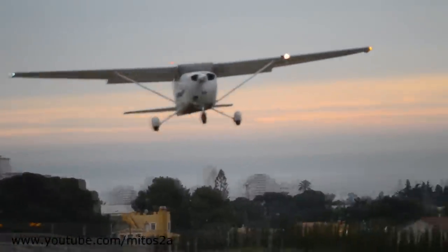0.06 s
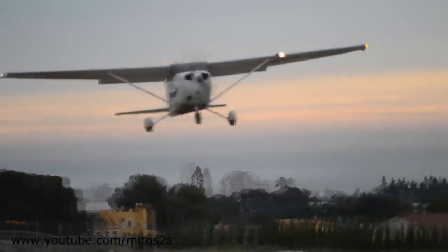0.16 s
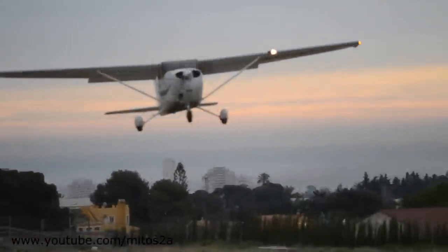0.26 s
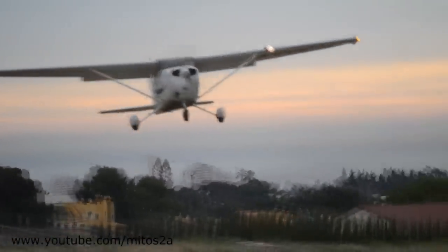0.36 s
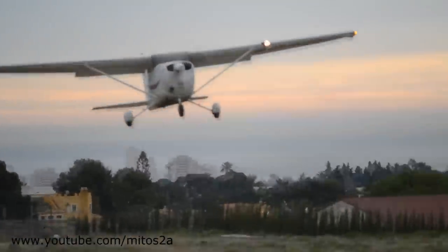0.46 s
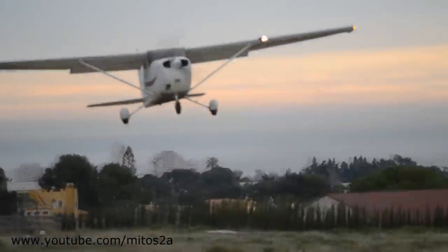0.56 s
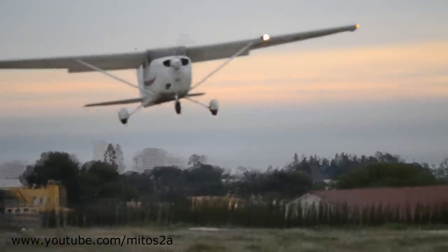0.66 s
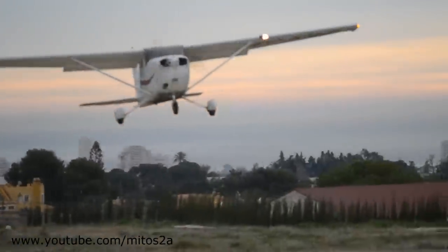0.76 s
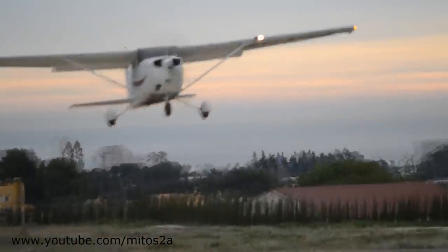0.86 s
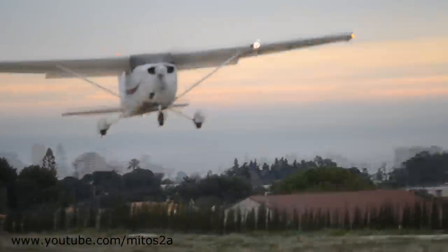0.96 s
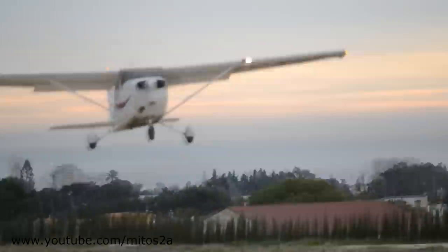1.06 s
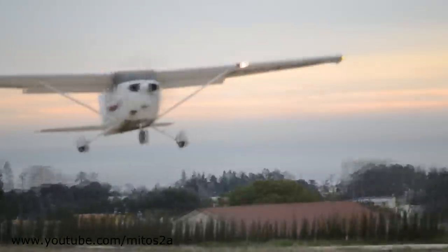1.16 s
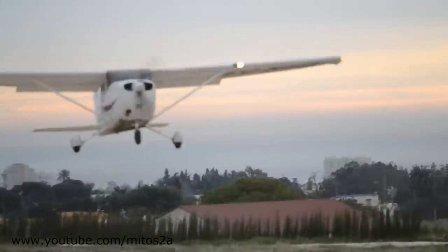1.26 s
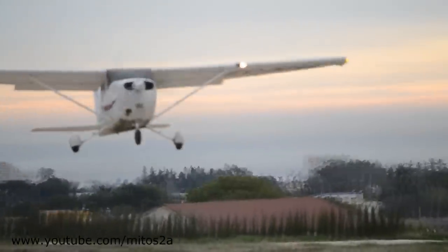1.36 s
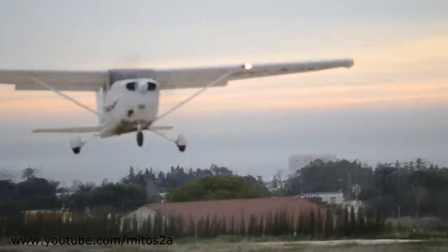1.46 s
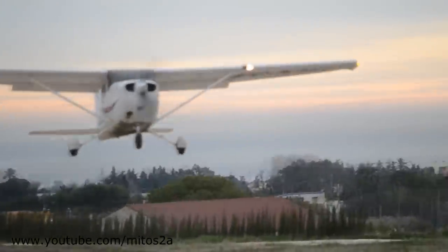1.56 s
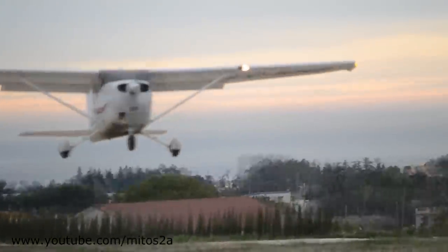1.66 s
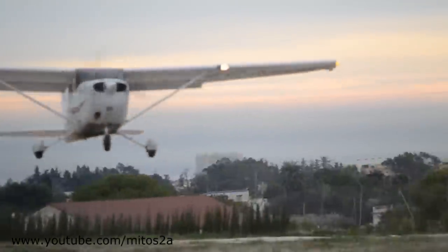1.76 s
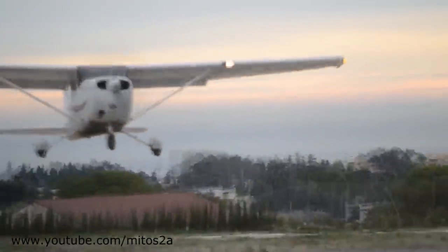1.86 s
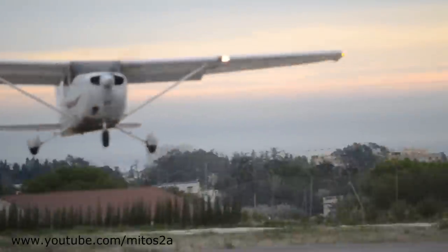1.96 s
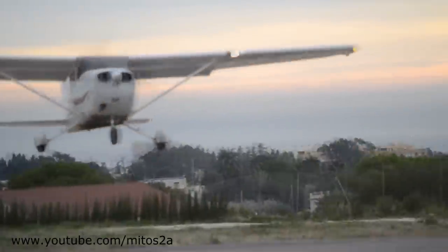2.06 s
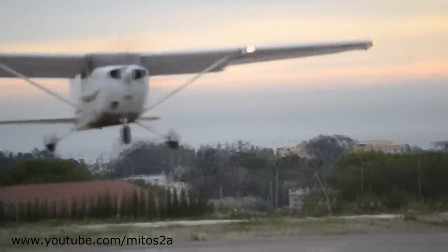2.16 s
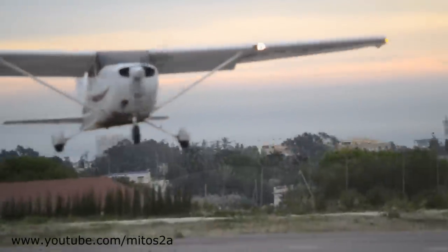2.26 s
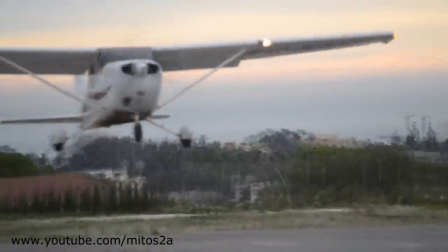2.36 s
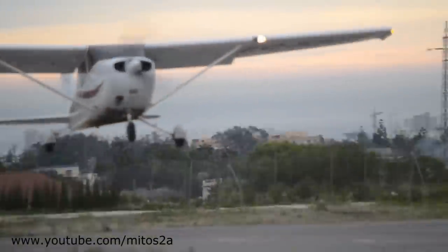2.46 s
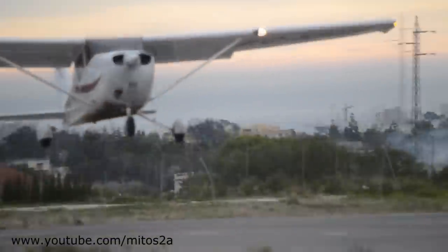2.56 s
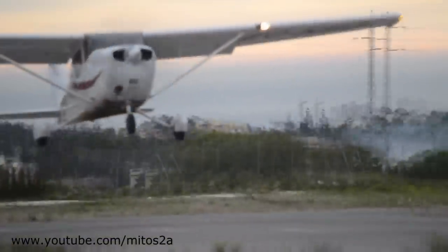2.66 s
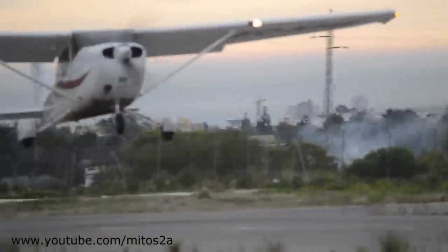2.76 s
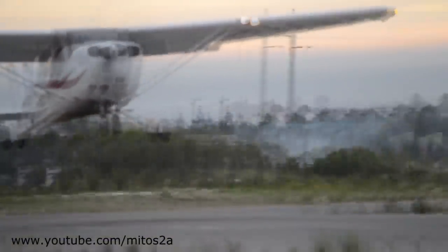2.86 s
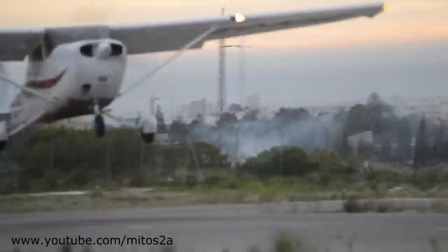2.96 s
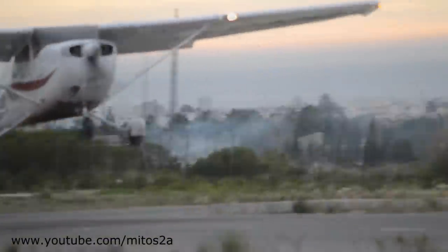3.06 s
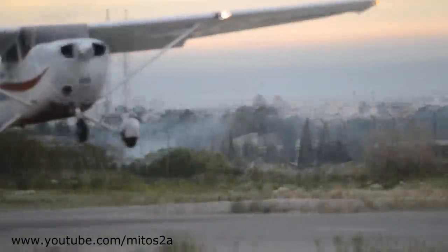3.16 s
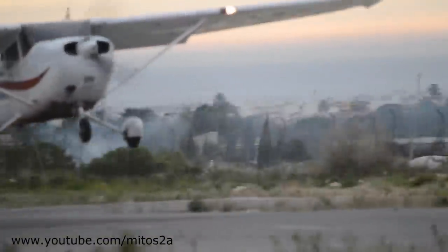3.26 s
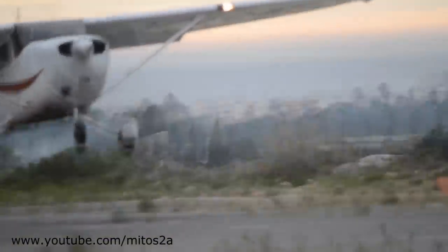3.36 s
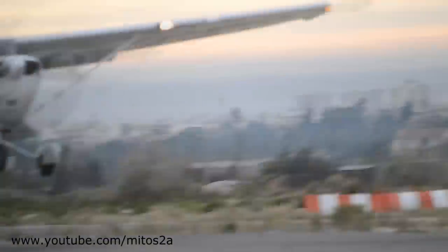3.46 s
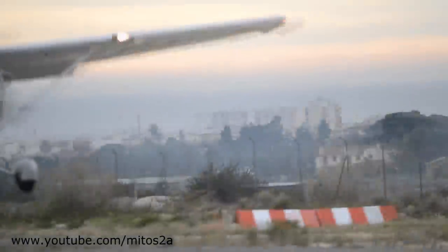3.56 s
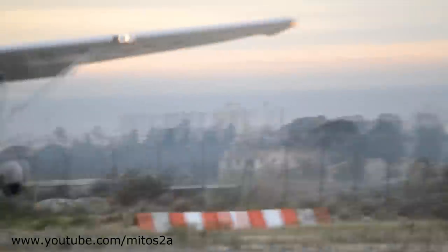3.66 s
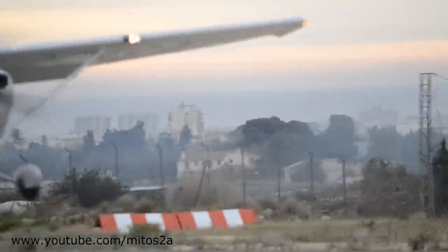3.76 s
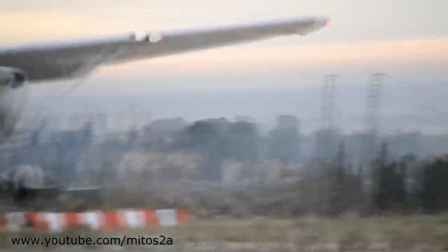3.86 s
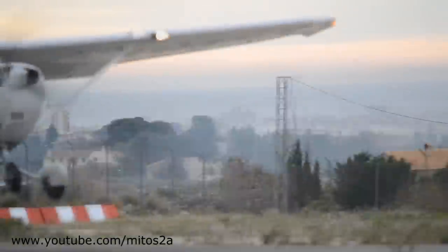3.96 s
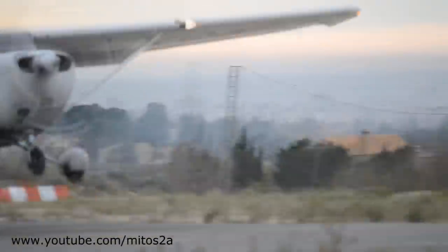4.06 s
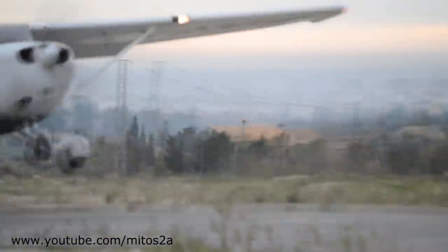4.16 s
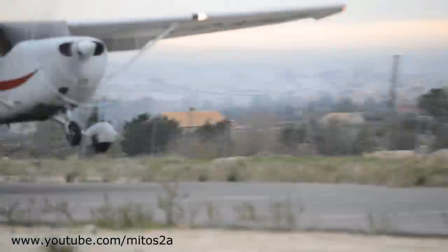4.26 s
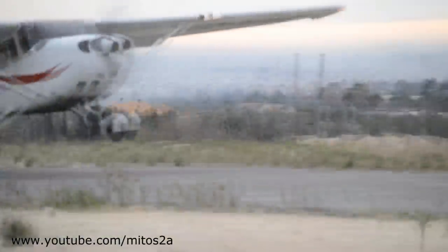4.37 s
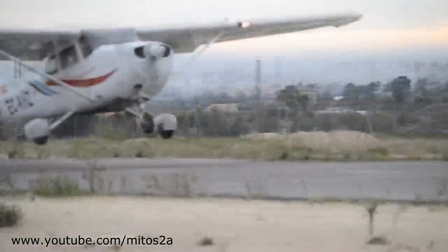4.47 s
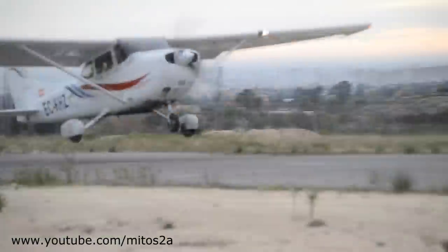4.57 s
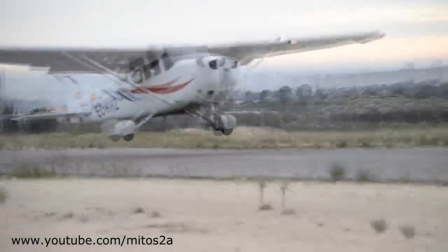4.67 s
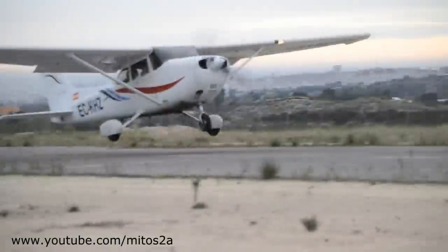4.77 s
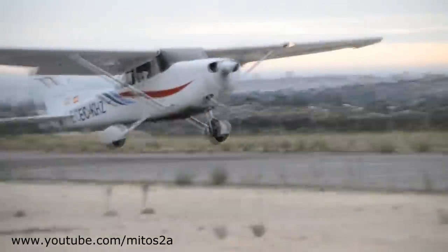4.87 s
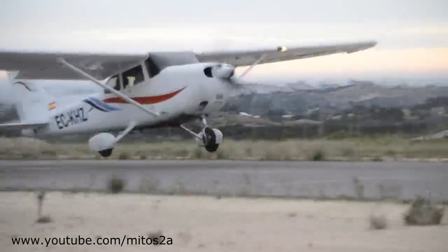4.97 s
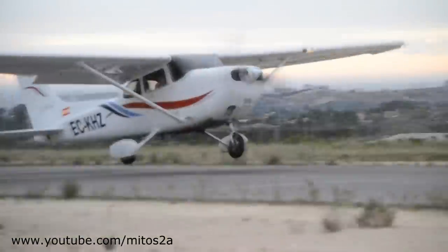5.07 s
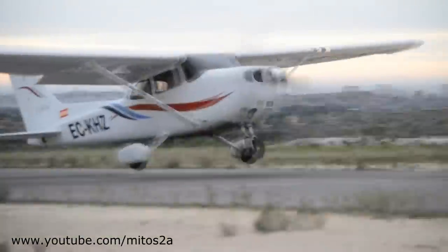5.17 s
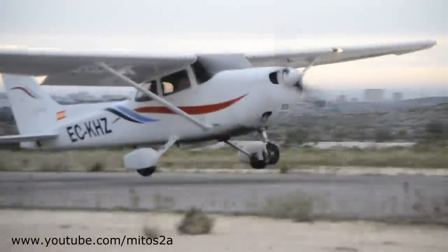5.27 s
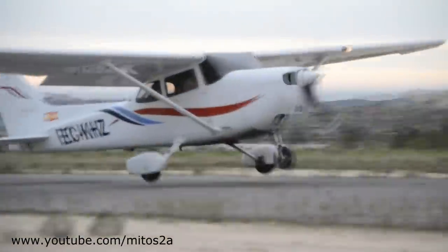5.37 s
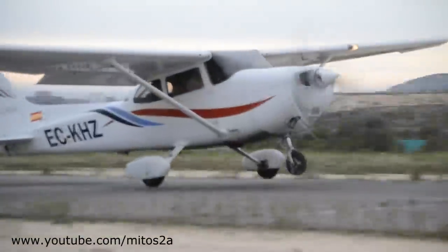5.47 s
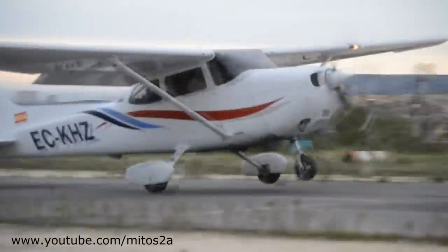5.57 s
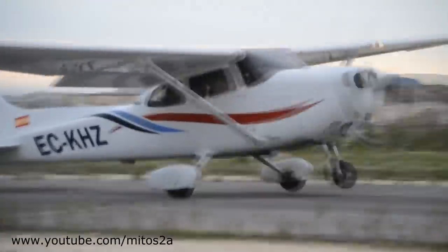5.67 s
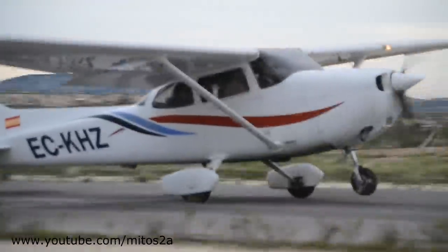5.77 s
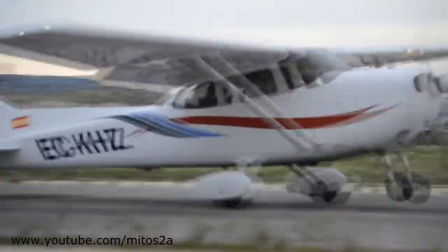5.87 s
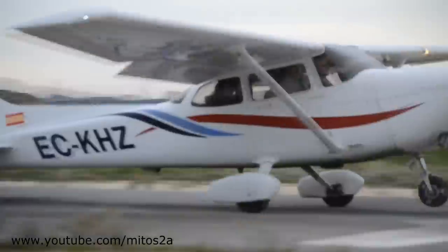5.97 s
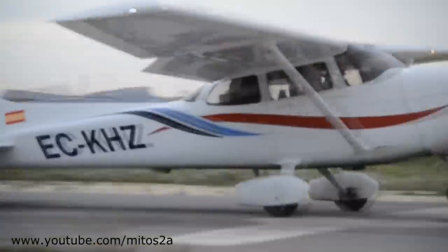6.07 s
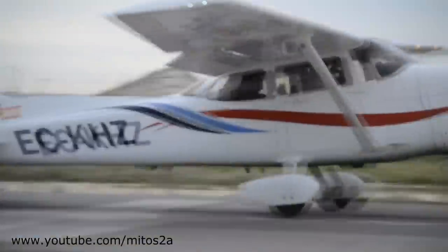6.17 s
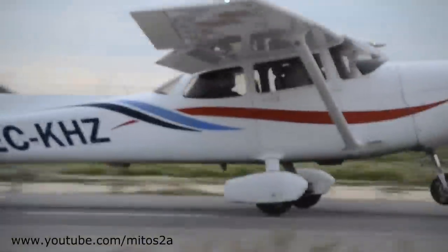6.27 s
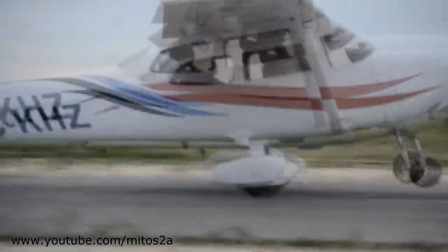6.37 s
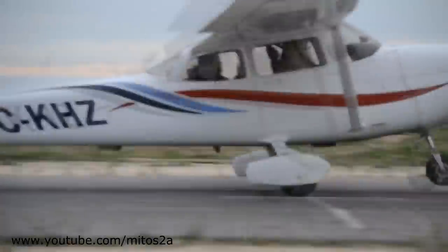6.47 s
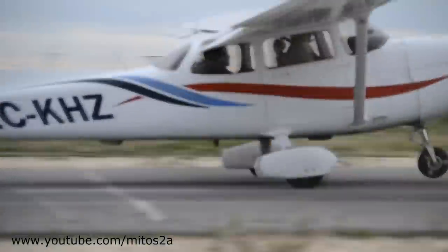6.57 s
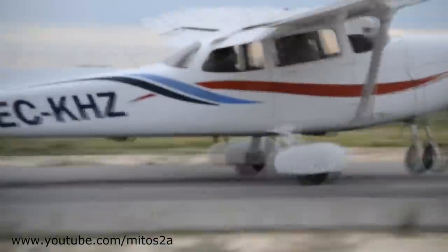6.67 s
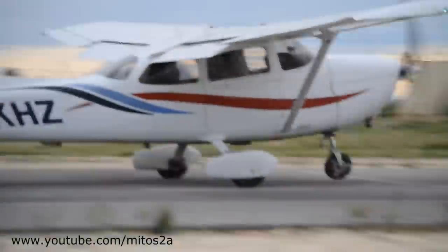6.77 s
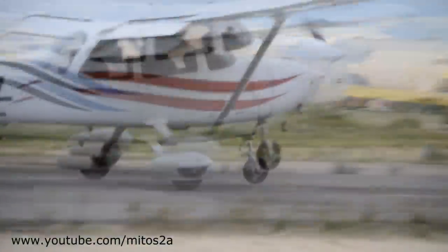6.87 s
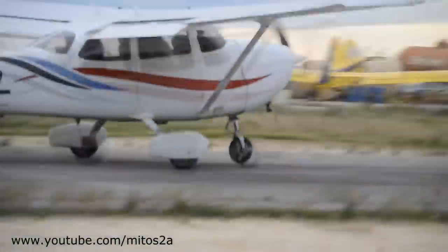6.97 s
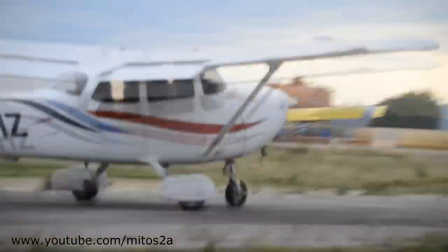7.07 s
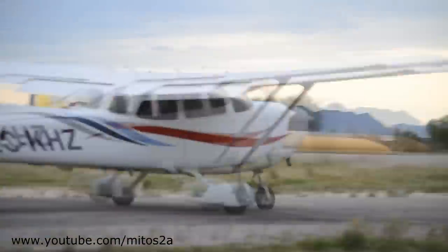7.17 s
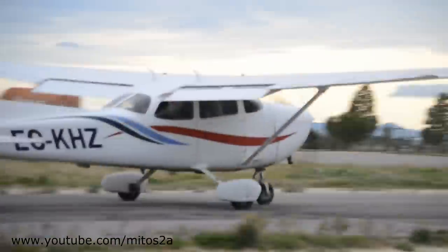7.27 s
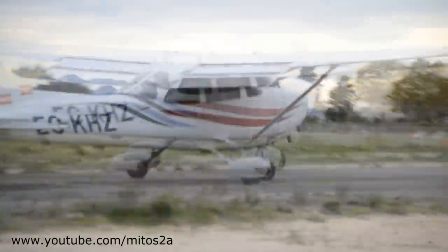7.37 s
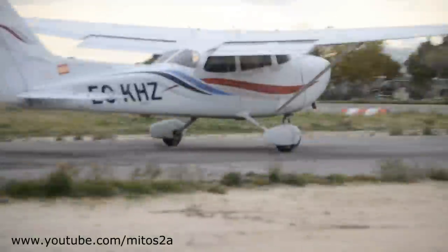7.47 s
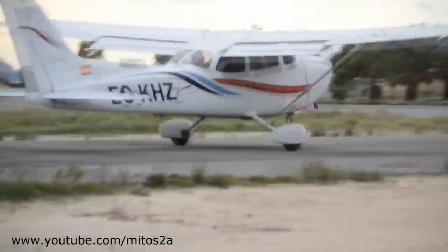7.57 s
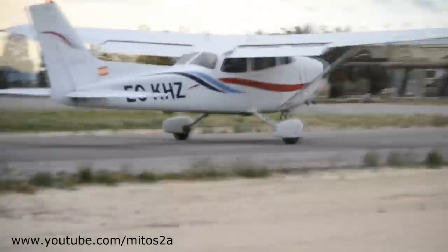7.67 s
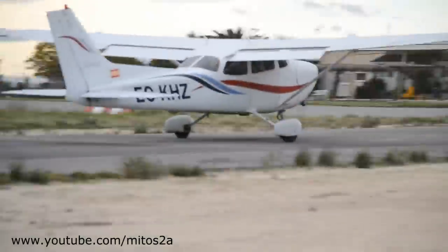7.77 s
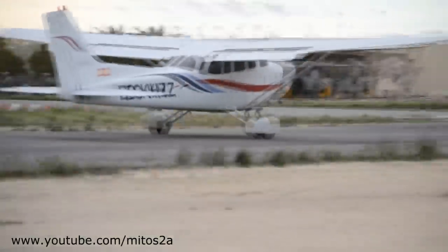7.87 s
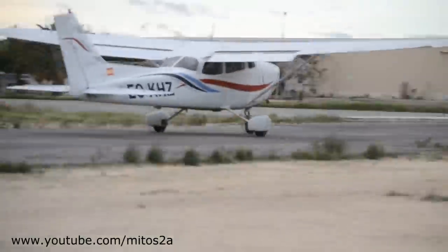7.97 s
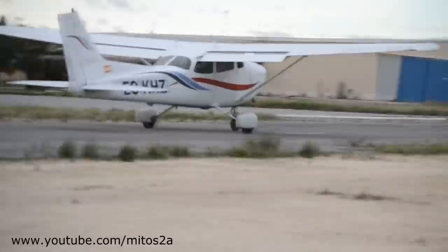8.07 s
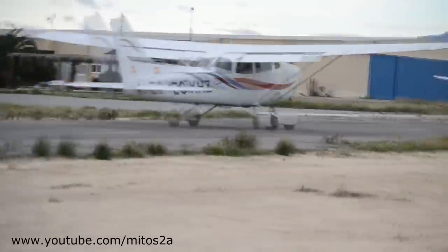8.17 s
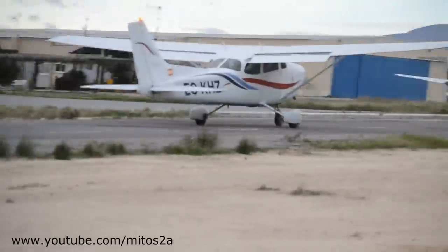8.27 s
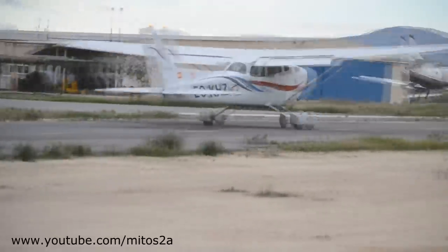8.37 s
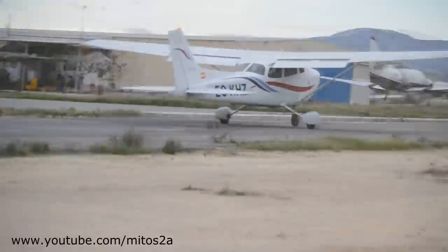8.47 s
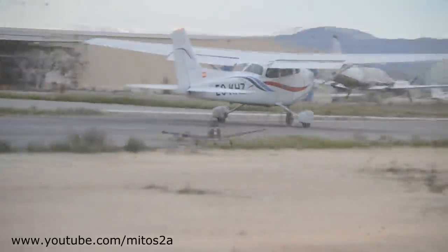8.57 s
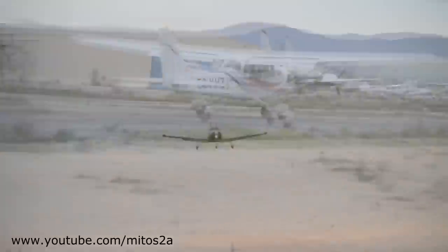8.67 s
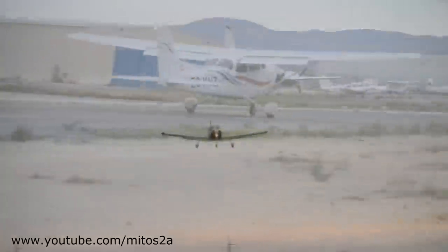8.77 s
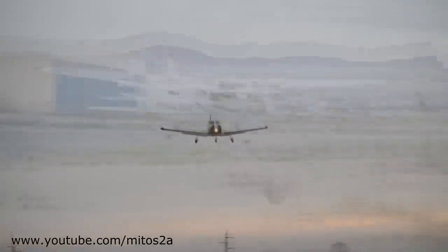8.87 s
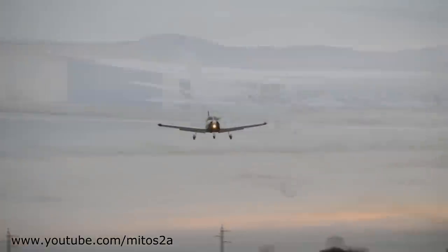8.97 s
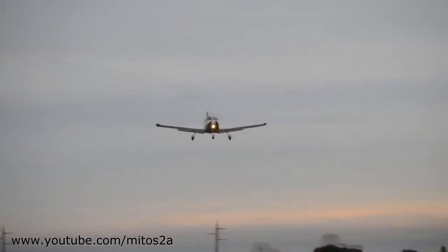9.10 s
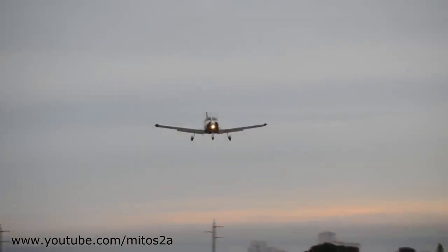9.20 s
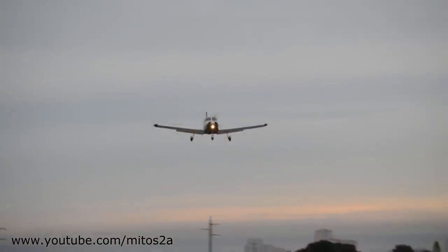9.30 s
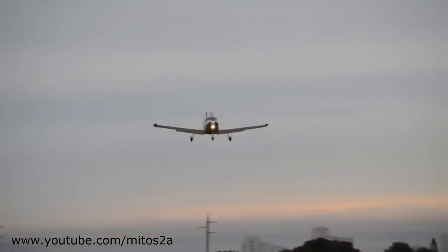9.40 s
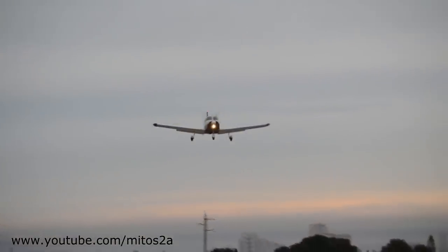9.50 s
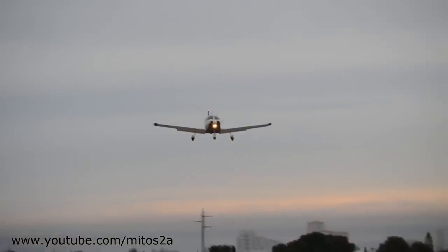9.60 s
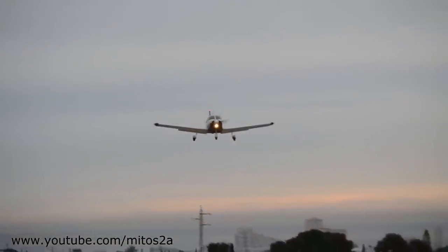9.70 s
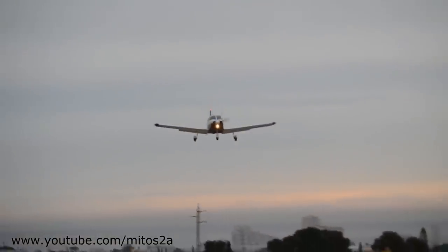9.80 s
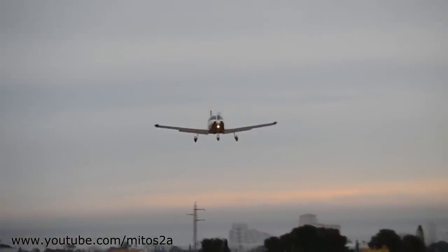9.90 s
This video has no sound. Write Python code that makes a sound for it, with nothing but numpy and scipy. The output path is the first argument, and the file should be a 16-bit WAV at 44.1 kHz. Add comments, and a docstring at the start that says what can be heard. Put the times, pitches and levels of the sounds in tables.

```python
"""Light aircraft landing

A light aircraft glides in throttled back: firing pulses make its exhaust note, burble and hiss, with pops.
Its blades and airframe rush; two main tyres chirp as stick-slip tones as it passes; it rolls away and fades.
A second aircraft, wavering tones over dull noise, drones faintly throughout and is left bare at the end."""
import sys
import numpy as np
from scipy import signal
from scipy.fft import rfft, irfft, next_fast_len
from scipy.io import wavfile
from scipy.ndimage import uniform_filter1d, map_coordinates

SR = 44100
rng = np.random.default_rng(int(sys.argv[2]) if len(sys.argv) > 2 else 0)


def materialize(psi):
    """Save the field psi as 16-bit PCM at rate SR to the path in sys.argv[1].

    A 1-D psi becomes a single channel; in a 2-D psi each row is a channel.
    """
    bounded = np.clip(np.atleast_2d(psi).T, -1, 1)
    quanta = np.round(bounded * 32767).astype(np.int16)
    wavfile.write(sys.argv[1], SR, quanta)


N = 438354
T = np.arange(N) / SR

# Distant aircraft's engine lines. Each row: frequency in Hz, relative level in dB.
DRONE_LINES = [(75, -51.5), (108, -65), (157, -54.5), (183, -54.5)]
# Spectrum of its roar. Each row: frequency in Hz, gain in dB.
DISTANT_ROAR = [(18, -57), (30, -38), (48, -19.5), (59, -15.5), (117, -9.5), (129, -11), (163, -7),
                (311, -12.5), (414, -24), (565, -16.5), (1400, -16), (2860, -30), (9000, -56.5),
                (11700, -95), (19800, -120)]
# Side of the aircraft heard. Each row: angle off the nose in degrees, side (0 far ahead, 1 nose, 2 flank, 3 tail).
ASPECT = [(10.3, 0), (15.7, 1), (58, 2), (116, 2.5), (149, 3)]
# Spectra of burble, air rush and exhaust hiss, one list per side 0-3. Each row: frequency in Hz, gain in dB.
BURBLE_SPECTRA = [
    [(21, -60), (35, -24), (101, -3), (184, 1), (302, -5), (464, -24), (520, -28), (680, -57), (1140, -120)],
    [(25, -22), (50, -5), (85, -11), (135, 2), (180, 0.5), (235, -2), (310, 3.5), (410, -9.5), (520, -8),
     (750, -58)],
    [(25, -31), (60, -14.5), (120, 0.5), (220, 7), (320, 0.5), (420, -19), (520, -3), (800, -49.5)],
    [(21, -62.5), (35, -38), (54, -14), (98, -7.5), (279, 5), (397, -13), (520, -2), (680, -21.5),
     (1140, -120)],
]
RUSH_SPECTRA = [
    [(220, -6.5), (380, -1), (468, -7), (508, -10.5), (546, -7.5), (784, -2), (877, -12.5), (1080, -3.5),
     (1350, -14), (1800, -6), (2230, -19), (2600, -20.5), (3380, -32), (5720, -120)],
    [(220, -46), (380, -4), (432, -23), (512, -5), (550, -8.5), (673, -1.5), (765, 0), (943, -11),
     (1090, -4.5), (1420, -11), (1500, -8), (1840, -5.5), (2130, -14), (2600, -13.5), (3380, -14),
     (5720, -120)],
    [(220, -37), (380, -12.5), (504, -13), (641, -1), (729, -1.5), (877, -6), (1110, -10), (1200, -13),
     (1480, -14), (1680, -12), (2040, -23), (2600, -16.5), (3380, -31.5), (5720, -120)],
    [(220, -54), (380, -13), (402, -10), (559, 0), (662, 5), (797, -7.5), (906, 0.5), (1100, -6),
     (1420, -8.5), (1930, -16), (2160, -14.5), (2600, -40.5), (3380, -46), (5720, -120)],
]
HISS_SPECTRA = [
    [(1240, -20), (2100, -1), (3020, -2.5), (3900, 0), (6420, -9), (8120, -19), (9220, -24.5), (11500, -55),
     (15000, -92), (22000, -120)],
    [(1240, -30), (2100, -9.5), (4630, 0.5), (5810, -5.5), (6560, -5.5), (7940, -14), (9360, -17),
     (10300, -30), (11500, -58), (15000, -63), (22000, -120)],
    [(1240, -55.5), (2100, -11), (3260, 0.5), (3900, -3.5), (4370, -1.5), (5300, -9.5), (8900, -7),
     (10000, -15.5), (11500, -47.5), (15000, -77.5), (22000, -120)],
    [(1300, -33), (2200, -2), (3000, -2.5), (4400, -7), (5700, -12), (7500, -15.5), (9400, -17),
     (10300, -28.5), (11500, -40), (15000, -84)],
]
# Top of the hiss. Each row: frequency in Hz, gain in dB.
SIZZLE_SPECTRUM = [(12300, -49.5), (13500, -8), (14500, -0.5), (15800, -18)]
# Radiation by direction, referred to the closest distance. Each row: angle off the nose in degrees,
# burble in dB, rush in dB, hiss in dB, share of the hiss that comes in puffs (0-1).
DIRECTIVITY = [(12, -29.5, -24.5, -28, 0.51), (28.5, -28, -27, -35, 0.3), (44.6, -30, -29.5, -35.5, 0.44),
               (92, -32, -29, -31.5, 0.85), (125.5, -33, -23.5, -32.5, 0.54), (147.8, -28, -29, -41, 0.02),
               (154, -28.5, -31, -44, 0.3)]
# Brief swells in passing. Each row: centre in seconds, half length in seconds, rush in dB, hiss in dB.
SWELLS = [(4.887, 0.43, 3, 5), (6.12, 0.14, 6.5, 0), (6.485, 0.077, 0.5, 3), (8.062, 0.11, 2.5, 0),
          (8.488, .13, 4.5, 2.5)]
# Engine speed on the glide. Each row: time in seconds, firings per second.
GLIDE = [(0, 50.95), (1.7, 55.75), (2.1, 56.3), (3.7, 54.9), (5.1, 53.8)]
# Throttle cuts. Each row: start in seconds, firings per second lost, settling time in seconds.
THROTTLE_CUTS = [(5.17, 12.1, .33), (7.2, 15.5, 1.02)]
# Mean strength of each cylinder's firing, in dB.
CYLINDERS_DB = [1.8, -0.055, -0.67, -0.48]
# Exhaust note. Each row: multiple of the firing rate, relative dB approaching, relative dB passing.
NOTE_ORDERS = [(1, -4, -23.5), (2, -4, -2.5), (3, -4, 1), (4, -19, -2), (5, 1.5, -1), (6, -2.5, -8.5),
               (7, -22, -17), (8, -15, -10.5)]
# Afterfire. Each row: time in seconds (the blow lands 3 ms later), relative strength in dB.
POPS = [(0.385, -19), (0.707, -23), (0.886, -25.5), (0.994, -20.5), (1.145, -28), (1.168, -23),
        (1.468, -23), (1.584, -22.5), (1.966, -32), (2.317, -19), (3.015, -20)]
# Pop spectrum. Each row: frequency in Hz, gain in dB.
POP_SPECTRUM = [(30, -30), (90, -7.5), (190, 2.5), (320, -2.5), (500, -10), (900, -41), (3000, -68),
                (8000, -100)]
# Metallic resonances of pipe and cowling: lowest and highest pitch in Hz.
RING_HZ = (2400, 11000)
# Main tyres. Each row: bite in seconds, skid before it in seconds, skid in dB, peak in dB, hold in seconds,
# decay in dB per second, pitch after the bite in Hz, drift in Hz per second, overtones in dB, scrub in dB.
CHIRPS = [(5.884, 0.024, -9, -2.5, .005, 419, 712, -600, -3.5, -14),
          (6.044, 0.021, -25, 2, 0.0063, 529.5, 621, 1700, -16, -20)]
# Tyre overtones. Each row: multiple of the pitch, relative level in dB.
TYRE_OVERTONES = [(2, -14), (3, -22), (4, -28), (5, -27.5), (6, -37.5)]
# Dry ticks on the roll-out. Each row: onset in seconds, relative level in dB.
TICKS = [(7.7828, -40), (8.1653, -34), (8.1973, -33), (8.4367, -39), (8.649, -35), (8.752, -34.5),
         (8.7694, -48), (8.9685, -39), (9.0773, -38)]
# Tick pitch: lowest and highest in Hz.
TICK_RING_HZ = (3200, 6000)
# Fuzz around a tick's pitch. Each row: distance from the pitch in Hz, gain in dB.
TICK_SPREAD = [(300, -3), (1200, -9), (3000, -20), (6000, -60)]
# Microphone response. Each row: frequency in Hz, gain in dB.
MICROPHONE = [(7300, 0), (7950, -3.5), (8500, 1), (11000, 6), (12200, -17)]

TOP_HZ = 15900  # band limit
# straight track past the listener
SPEED_M_PER_S, CLOSEST_M, ABREAST_S, SOUND_M_PER_S = 22, 19.8, 6.4, 343
DULL_BEYOND_M, DULL_DB_PER_M = 106.2, 0.26  # air and ground soak up far hiss
FADE_FROM_S, FADE_S, FADE_CURVE = 8.55, 0.85, 0.92
# lean running: louder burble, weaker note
LEAN_UNTIL_S, LEAN_CLEARS_S, LEAN_BURBLE_DB, LEAN_NOTE_DB = 2.94, 0.35, 9, -4.5
# the exhaust softens at idle, the note more gradually than the burble
IDLE_FROM_S, IDLE_TAKES_S, IDLE_BURBLE_DB = 7.62, 0.01, -8.5
NOTE_DIES_S, NOTE_DIES_IN_S, IDLE_NOTE_DB = 7.67, 0.2, -18
NOTE_DB = -28  # at the closest distance, before lean and idle changes
NOTE_TURNS_S, NOTE_TURNS_IN_S = 5.35, 0.06  # approaching to passing colour
SKID_HZ, BITE_S = 1026, 0.0023  # pitch of first light contact; time to take load
SPIN_UP_S = 0.04  # pitch drifts this long after the bite
BITE_ROUGH, ROUGH_PER_S = 0.41, 14.2  # flare at the bite; growth after it


def amp(db):
    """Decibels to gain."""
    return 10 ** (np.asarray(db) / 20)


def unit(x):
    """Scale to rms 1."""
    return x / np.sqrt(np.mean(x ** 2) + 1e-20)


def step(s, width_s):
    """Smooth change from 0 to 1 around time s."""
    return (1 + np.tanh((T - s) / (2 * width_s))) / 2


def wobble(knots_per_s):
    """Smooth random curve through normally distributed knots."""
    knots = rng.standard_normal(int(N * knots_per_s / SR) + 4)
    return map_coordinates(knots, [T * knots_per_s])


def coloured(x, points):
    """Causal minimum-phase filter whose gain follows (Hz, dB) points."""
    size = 2 * next_fast_len(N // 2 + 8192)
    hz, db = np.transpose(points)
    log_hz = np.log(np.fft.rfftfreq(size, 1 / SR) + 1)
    gain = amp(np.interp(log_hz, np.log(hz), db))
    # folding the cepstrum onto positive time gives minimum phase
    cepstrum = irfft(np.log(np.maximum(gain, 1e-6)))
    cepstrum[1:size // 2] *= 2
    cepstrum[size // 2 + 1:] = 0
    return irfft(rfft(x, size) * np.exp(rfft(cepstrum)))[:N]


def noise(points):
    """Coloured noise of rms 1."""
    return unit(coloured(rng.standard_normal(N), points))


def track():
    """Distance (m) and the listener's angle off the nose (degrees)."""
    to_go_m = SPEED_M_PER_S * (ABREAST_S - T)
    return np.hypot(to_go_m, CLOSEST_M), np.degrees(np.arctan2(CLOSEST_M, to_go_m))


def facing(rows):
    """Each column of an angle table, as the aircraft turns past the listener."""
    degrees, *columns = np.transpose(rows)
    angle = track()[1]
    return [np.interp(angle, degrees, column) for column in columns]


def spreading():
    """Sound pressure falls as one over the distance."""
    return CLOSEST_M / track()[0]


def swells():
    """Extra dB of the rush and of the hiss."""
    return sum(np.outer([rush_db, hiss_db], np.exp(-((T - s) / half_s) ** 2))
               for s, half_s, rush_db, hiss_db in SWELLS)


def firing():
    """Firings per second as heard: run-down after each throttle cut, then Doppler shift."""
    rate = np.interp(T, *np.transpose(GLIDE))
    for s, lost, settle_s in THROTTLE_CUTS:
        rate = rate - lost * (1 - np.exp(-np.maximum(T - s, 0) / settle_s))
    closing = np.cos(np.radians(track()[1]))
    return rate / (1 - SPEED_M_PER_S / SOUND_M_PER_S * closing)


def radiated(x, spectra):
    """Blend the spectra of the sides facing the listener; even out the slow level."""
    aspect, = facing(ASPECT)
    y = 0
    for side, spectrum in enumerate(spectra):
        weight = np.maximum(1 - abs(aspect - side), 0)
        y = y + weight * unit(coloured(x, spectrum))
    power = uniform_filter1d(y ** 2, size=SR // 3)
    return y / np.sqrt(abs(power) + 1e-9)


def puffs(cycle, lead, rise, fall, scatter_db):
    """Gas flow of rms 1: a valve opens once per firing and the cylinder blows down (times in firings)."""
    turn = cycle + lead + 1
    index, age = np.maximum(turn, 0).astype(int), turn % 1
    scatter = scatter_db * rng.standard_normal(index.max() + 1)[index]
    strength = amp(np.take(CYLINDERS_DB, index % len(CYLINDERS_DB)) + scatter)
    return unit(strength * (1 - np.exp(-(age / rise) ** 2)) * np.exp(-age / fall))


def gated(flow, share):
    """Noise of which a share of the power follows the squared flow."""
    share = np.clip(share, 0, 1)
    return rng.standard_normal(N) * np.sqrt(1 - share + share * flow ** 2)


def distant_aircraft(level_db):
    """Wavering engine lines over a dull far-off roar."""
    lines = 0
    for hz, db in DRONE_LINES:
        level = amp(db + 2.8 * wobble(5.8)) * np.sqrt(2)
        lines = lines + level * np.sin(2 * np.pi * hz * T + 0.65 * wobble(7))
    roar = amp(-43.0 + 0.54 * wobble(5.5)) * noise(DISTANT_ROAR)
    return amp(level_db) * (lines + roar)


def airfield(x, level_db, t60_s):
    """Faint scatter from the ground and the hangars: a decaying noise tail."""
    tail = rng.standard_normal(SR) * amp(-60 * T[:SR] / t60_s)
    return x + amp(level_db) * signal.fftconvolve(x, tail / np.linalg.norm(tail))[:N]


def ticks(level_db, decay_s):
    """Short dry crackles from the idling aircraft, each ringing at its own pitch."""
    rings = 0
    for s, db in TICKS:
        hz = rng.uniform(*TICK_RING_HZ)
        rings = rings + (T >= s) * amp(db) * np.exp(-abs(T - s) / decay_s) * np.sin(2 * np.pi * hz * T)
    # low noise as multiplier spreads each pitch
    return amp(level_db) * rings * noise(TICK_SPREAD)


def whine(cycle, level_db):
    """Fuzzy tone at 32 times the firing rate, swelling and sinking during the approach."""
    tone = np.sin(2 * np.pi * 32 * cycle + 0.98 * wobble(90))
    return amp(level_db + 1.1 * wobble(25.7)) * tone * np.exp(-((T - 3.2) / 1.3) ** 2)


def knock(cycle, level_db, hz, lead, decay_s):
    """One cylinder knocks hollowly once in four firings, most strongly during the approach."""
    count = len(CYLINDERS_DB)
    age_s = (cycle / count + lead) % 1 * count / firing()
    ring = np.sin(2 * np.pi * hz * age_s) * age_s / decay_s * np.exp(1 - age_s / decay_s)
    return amp(level_db + 1.6 * wobble(16)) * ring * np.exp(-((T - 4.2) / 1.5) ** 2)


def rush(cycle):
    """Air torn by the propeller and the airframe, throbbing with the blades."""
    _, level_db, _, share = facing(DIRECTIVITY)
    flow = puffs(cycle, lead=0.46, rise=0.099, fall=0.78, scatter_db=4.5)
    air = gated(flow, 0.55 * share)
    return spreading() * amp(level_db + swells()[0] + 0.13 * wobble(14)) * radiated(air, RUSH_SPECTRA)


def ringing(cycle, lead, count=5):
    """Every firing rings a few of the many resonances of the hot pipe and cowling."""
    index = np.maximum(cycle + lead + 1, 0).astype(int)
    pitches_hz = rng.uniform(*RING_HZ, (index.max() + 1, count))[index].T
    return unit(sum(np.sin(2 * np.pi * np.cumsum(hz) / SR + 1.58 * wobble(1100)) for hz in pitches_hz))


def hiss(cycle, lead):
    """Each blow-down spits a jet of hiss with a metallic tick, sharpest when the pipe is abreast."""
    _, _, beam_db, share = facing(DIRECTIVITY)
    dulling_db = DULL_DB_PER_M * np.maximum(track()[0] - DULL_BEYOND_M, 0)
    level_db = beam_db + swells()[1] - dulling_db
    air = noise([(1000, -34.5), (2200, 3.0), (6000, 0), (10000, -5), (20000, -19.0)])
    flow = puffs(cycle, lead, rise=0.074, fall=0.23, scatter_db=1.5)
    pings = flow * ringing(cycle, lead)
    jet = np.sqrt(1 - share + 0.18 * share * flow ** 2) * air + 1.11 * np.sqrt(share) * pings
    sizzle = unit(coloured(gated(flow, share), [(9000, -100)] + SIZZLE_SPECTRUM))
    sizzle_db = -13.5 - 7 * abs(facing(ASPECT)[0] - 2)  # strongest off the flank
    return spreading() * amp(level_db) * (radiated(jet, HISS_SPECTRA) + sizzle * amp(sizzle_db))


def afterfire(level_db):
    """Unburnt fuel pops in the silencer: filtered impulses."""
    blows = np.zeros(N)
    for s, db in POPS:
        blows[round((s + .003) * SR)] = amp(db)
    thumps = coloured(blows, POP_SPECTRUM)
    # match the peak to the strongest blow
    return amp(level_db) * thumps * blows.max() / abs(thumps).max()


def exhaust(cycle):
    """A steady note from the firings; running lean they burn unevenly and burble in the pipe."""
    lean = 1 - step(LEAN_UNTIL_S, LEAN_CLEARS_S)
    idle = step(IDLE_FROM_S, IDLE_TAKES_S)
    passing = step(NOTE_TURNS_S, NOTE_TURNS_IN_S)
    note = 0
    for k, ahead_db, beside_db in NOTE_ORDERS:
        # the pipe delays the higher orders, spreading each pulse
        phase = 2 * np.pi * k * cycle - 0.155 * k ** 2 + 0.2 * wobble(4)
        note = note + amp(ahead_db + passing * (beside_db - ahead_db)) * np.cos(phase)
    flow = puffs(cycle, lead=0.086, rise=0.13, fall=0.25, scatter_db=3.5)
    burble = radiated(gated(flow, share=0.47), BURBLE_SPECTRA)
    note_db = NOTE_DB + LEAN_NOTE_DB * lean + IDLE_NOTE_DB * step(NOTE_DIES_S, NOTE_DIES_IN_S)
    burble_db = facing(DIRECTIVITY)[0] + LEAN_BURBLE_DB * lean + IDLE_BURBLE_DB * idle
    return spreading() * (amp(note_db) * unit(note) + amp(burble_db) * burble)


def tyre(s, skid_s, skid_db, peak_db, hold_s, decay_db_per_s, bite_hz, drift_hz_per_s, overtone_db, scrub_db):
    """Rubber sticks and slips: a light high skid, a pitch drop at the bite, break-up as the wheel spins up."""
    load, age_s = step(s, BITE_S), np.maximum(T - s, 0)
    hz = SKID_HZ + load * (bite_hz - SKID_HZ) + drift_hz_per_s * np.minimum(age_s, SPIN_UP_S)
    db = skid_db + step(s - BITE_S, BITE_S) * (peak_db - skid_db)
    db = db - decay_db_per_s * np.maximum(age_s - hold_s, 0)
    flare = BITE_ROUGH * np.exp(-((T - s - BITE_S) / 0.0026) ** 2)
    rough = np.clip(0.063 + flare + ROUGH_PER_S * age_s, 0, .55)
    phase = 2 * np.pi * np.cumsum(hz) / SR + 0.87 * rough * wobble(260)
    overtones = sum(amp(level_db) * np.sin(k * phase + 0.96 * wobble(500)) for k, level_db in TYRE_OVERTONES)
    scrub = noise([(100, -20.5), (450, -31.5), (750, 4), (1300, -1), (3000, -5.0), (6000, -21), (12000, -63)])
    rasp = 2 * np.sqrt(abs(rough)) * (amp(overtone_db) * overtones + amp(scrub_db) * scrub)
    squeal = np.sin(phase) * (1 + 1.04 * rough * wobble(220))
    touching = np.clip((T - s + skid_s) / .006, 0, 1)
    return touching * amp(db) * (squeal + rasp)


def scene():
    """The landing aircraft fades, leaving the distant one."""
    cycle = np.cumsum(firing()) / SR  # firings so far
    distant = distant_aircraft(level_db=-5.0)
    engine = exhaust(cycle) + afterfire(level_db=-1) + hiss(cycle, lead=.05)
    engine = engine + knock(cycle, level_db=-24.5, hz=737, lead=.55, decay_s=0.0011)
    aircraft = engine + rush(cycle) + whine(cycle, level_db=-44.5)
    fade = np.clip(1 - (T - FADE_FROM_S) / FADE_S, 0, 1) ** FADE_CURVE
    tyres = airfield(sum(tyre(*row) for row in CHIRPS), level_db=-20.5, t60_s=0.63)
    return (distant + fade * aircraft + ticks(level_db=-6.5, decay_s=0.0079) + tyres)[None]


def record(dry):
    """Microphone colour, overload at full scale and the band limit."""
    x = np.clip(coloured(dry[0], MICROPHONE), -1, 1)
    return irfft(rfft(x) * (np.fft.rfftfreq(N, 1 / SR) < TOP_HZ), N)[None]


dry = scene()
out = record(dry)
materialize(out)
```